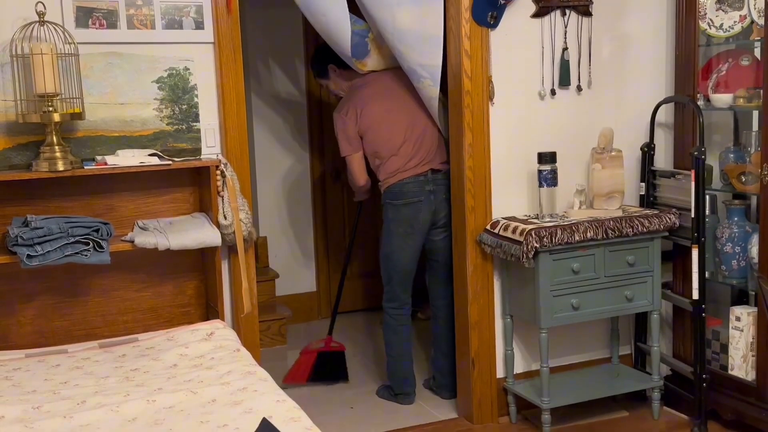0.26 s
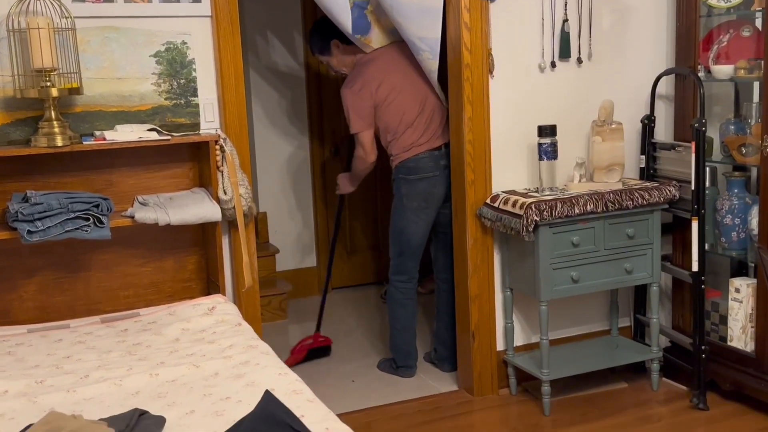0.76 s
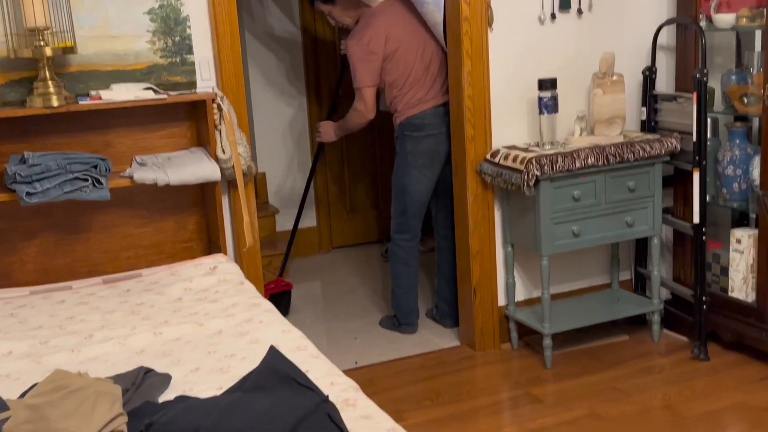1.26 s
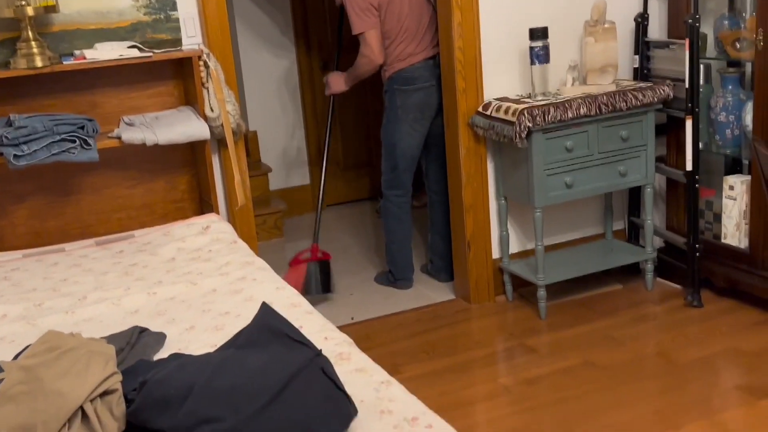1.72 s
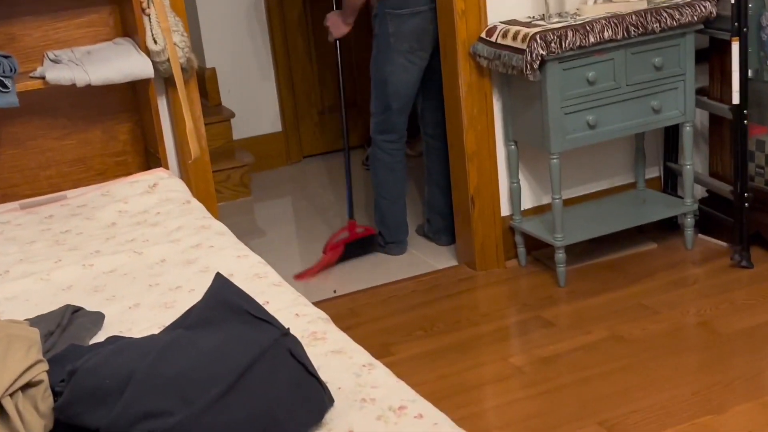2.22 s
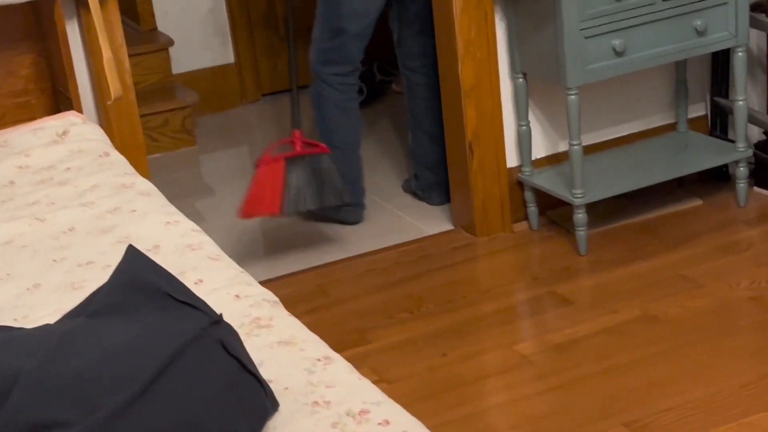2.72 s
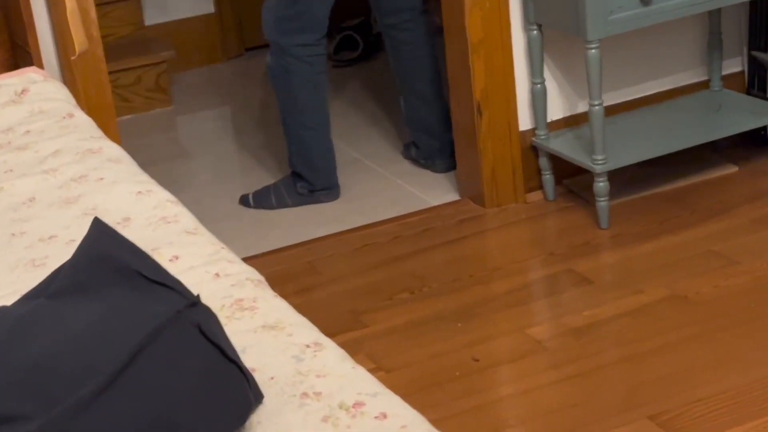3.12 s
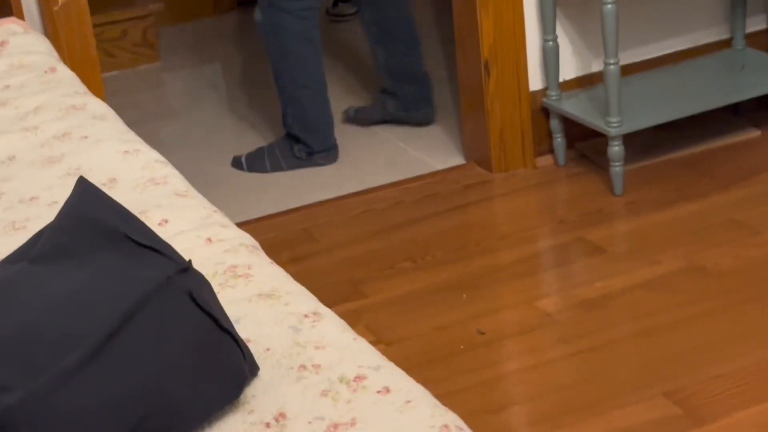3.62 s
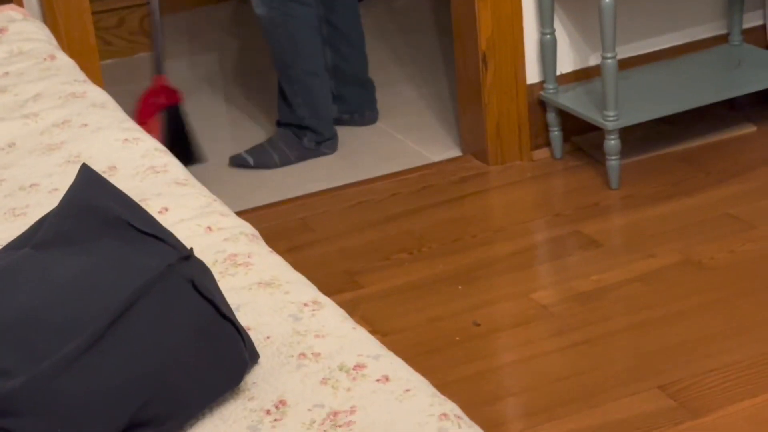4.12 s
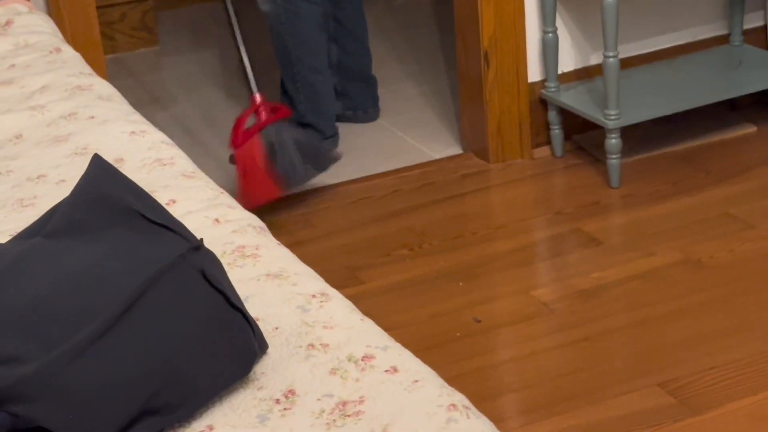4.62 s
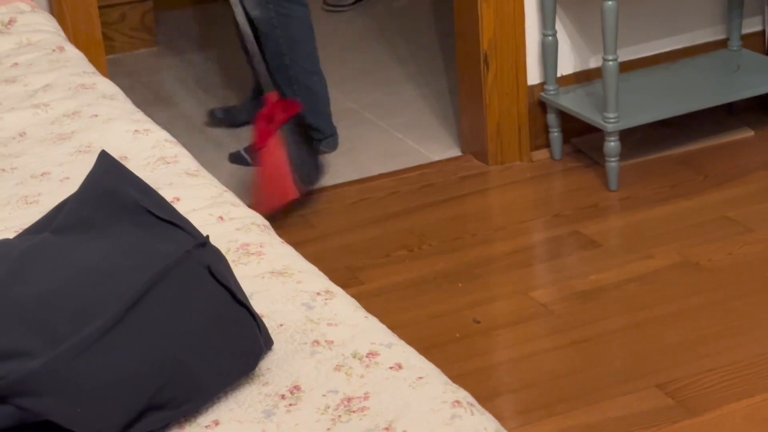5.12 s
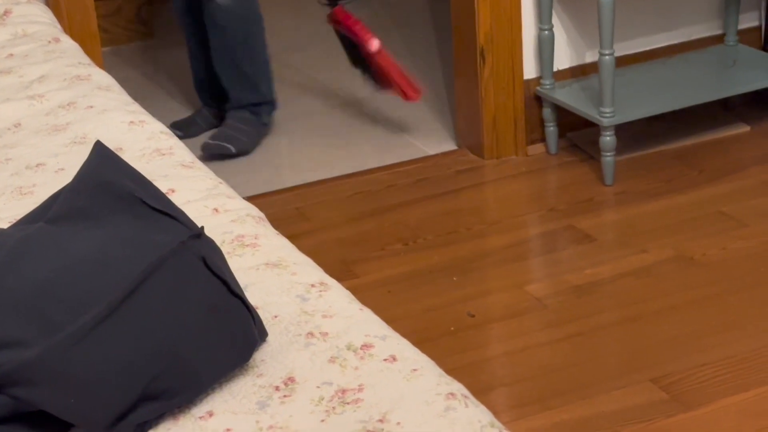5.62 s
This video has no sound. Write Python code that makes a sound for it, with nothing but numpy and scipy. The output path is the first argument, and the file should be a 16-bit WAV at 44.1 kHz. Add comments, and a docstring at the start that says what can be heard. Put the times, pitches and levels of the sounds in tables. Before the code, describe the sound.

Stiff bristles land, drag and trail off on a hard hallway floor, making airy hiss and lower scrape. Early touches are soft; a sudden crisp stroke stands out, followed by near quiet. Later sweeps are firmer, with plastic rattle, wooden thuds and a dull floor boom on the last knock. Distant phone pickup, reflective tiled space, faint steady hiss and low house rumble beneath.

```python
"""A plastic broom sweeps a tiled hallway in the next room, over the low rumble of the house.
House: filtered noise whose rumble slowly swells and sinks. Feet: short dull tones from the floor.
Broom: dense random clicks, filtered into hiss and scrape, with a few raspy whistles for squeaks.
Knocks: fading tones of the plastic head, woodwork and floor; the last one has a low thump.
The hallway adds echoes after each stroke."""
import sys
import numpy as np
from scipy import signal
from scipy.fft import rfft, irfft, next_fast_len
from scipy.io import wavfile
from scipy.ndimage import uniform_filter1d

SR = 44100
rng = np.random.default_rng(int(sys.argv[2]) if len(sys.argv) > 2 else 0)


def wrap_up_sound(samples):
    """Save the sound to the file named by the first command line argument, as 16-bit audio."""
    columns = np.atleast_2d(samples).T
    # keep every value between -1 and 1, then stretch to whole-number steps
    tamed = np.clip(columns, -1, 1)
    steps = np.round(tamed * 32767).astype(np.int16)
    wavfile.write(sys.argv[1], SR, steps)


N = 258602
TIME = np.arange(N) / SR
TOP_HZ = 15700  # upper limit of the sound


def undb(db):
    """Turn decibels into a plain gain."""
    return 10 ** (np.asarray(db) / 20)


def unit(x):
    """Scale to an rms (average strength) of 1."""
    return x / np.sqrt(np.mean(x ** 2))


def along(points, hz):
    """Read a value between (f/Hz, value) points, spacing pitch by ratio as the ear does."""
    f, value = np.transpose(points)
    return np.interp(np.log(np.maximum(hz, 1)), np.log(f), value)


def shape(x, response):
    """Filter a signal by a response given as a function of frequency."""
    size = next_fast_len(N + SR)
    hz = np.arange(size // 2 + 1) * SR / size
    return irfft(rfft(x, size) * response(hz), size)[:N]


def colour(x, points):
    """Give a signal a (f/Hz, level/dB) spectrum, keeping the power of white noise."""
    return shape(x, lambda hz: unit(undb(along(points, hz))))


def walk(rate):
    """Smooth random wander with an rms of 1; a higher rate (steps per second) wanders faster."""
    size = int(SR / rate)
    steps = np.repeat(rng.standard_normal(N // size + 1), size)[:N]
    smoothed = uniform_filter1d(uniform_filter1d(steps, size), size)
    return unit(smoothed)


def fade(t, t60):
    """Start at t = 0 and die away exponentially, falling 60 dB in t60 seconds."""
    return (t >= 0) * np.exp(-np.log(1000) * np.maximum(t, 0) / t60)


def ring(modes, t):
    """An object struck at t = 0 rings in several fading tones of alternating sign, for one second at most."""
    out = np.zeros(len(t))
    live = (t >= 0) & (t < 1)
    for k, (hz, db, t60) in enumerate(modes):
        tone = np.sin(2 * np.pi * hz * t[live]) * fade(t[live], t60)
        out[live] += (-1) ** k * undb(db) * tone
    return out


def flicks(per_s, spread_db):
    """Many small slips make dense random clicks; a larger spread lets a few stand out."""
    size = undb(spread_db * np.minimum(rng.exponential(size=N), 4))
    hits = rng.random(N) < per_s / SR
    return unit(hits * size * rng.standard_normal(N))


# spectrum of the rumble and faint hiss of the house: f/Hz, level/dB (per Hz, relative)
HOUSE_SPECTRUM = [(20, -16), (35, -8), (55, .5), (80, -3.5), (115, -2), (160, -9), (220, -11.5), (320, -18),
                  (480, -25), (700, -35), (1200, -42), (1800, -35.5), (4500, -42), (7000, -37),
                  (12000, -49), (15500, -45)]
HOUSE_DB = -50  # level of the noise before its low part is changed
RUMBLE_DB, RUMBLE_WANDER_DB = -50, -1.56  # level of the low part, and its wander (rms; sign flips it)


def house():
    """Noise gives a low rumble that slowly swells and sinks, under a steady faint hiss."""
    noise = undb(HOUSE_DB) * colour(rng.standard_normal(N), HOUSE_SPECTRUM)
    low = shape(noise, lambda hz: 1 / (1 + (hz / 160) ** 4))
    wander_db = RUMBLE_WANDER_DB * walk(rate=1.18)
    return noise - low + low * undb(RUMBLE_DB - HOUSE_DB + wander_db)


# hallway decay: f/Hz, time to fall 60 dB t60/s
HALL_DECAY = [(200, 0.48), (1400, 0.51), (4000, 0.4), (12000, 0.44)]


def hallway(x, linger_db=-10, linger_t60=1.37):
    """Echoes alone: dense ones from tiles and walls, then a faint bright tail that lingers."""
    edges = np.geomspace(80, 20480, 9)
    t = TIME[:2 * SR]
    noise, late = rng.standard_normal((2, len(t)))
    echo = np.zeros(len(t))
    for lo, hi in zip(edges, edges[1:]):
        band_filter = signal.butter(2, [lo, hi], "band", fs=SR, output="sos")
        band = signal.sosfilt(band_filter, noise)
        echo += band * fade(t - .004, along(HALL_DECAY, np.sqrt(lo * hi)))
    bright_filter = signal.butter(1, 2600, "high", fs=SR, output="sos")
    tail = signal.sosfilt(bright_filter, late) * fade(t - .03, linger_t60)
    response = echo / np.linalg.norm(echo) + undb(linger_db) * tail / np.linalg.norm(tail)
    return signal.fftconvolve(x, response)[:N]


# stockinged feet on the floor: t/s, level/dB (before mixing)
FOOTFALL_TIMES = [(.59, -37), (3.542, -35), (5.151, -41)]


def footfalls(pitch_hz=100, t60=0.093):
    """A padded heel gives the floor one short, dull push, heard as a fading low tone."""
    return sum(ring([(pitch_hz, db, t60)], TIME - start) for start, db in FOOTFALL_TIMES)


# tones of the hollow plastic head: f/Hz, level/dB (relative), time to fall 60 dB t60/s
HEAD_TONES = [(393, -6, 0.089), (458, -5.5, 0.18), (681, -10.5, 0.66), (732, -3.5, 0.13), (794, -1, 0.13),
              (895, -1, 0.1), (1002, 4.5, 0.039), (1115, 3.5, 0.046), (1163, -5.5, 0.11),
              (1253, -1.5, 0.099), (1330, -4, 0.15), (1650, -11, .07), (1980, -13, .07), (2220, -10, 0.054)]
# tones of the woodwork: f/Hz, level/dB (relative), time to fall 60 dB t60/s
WOOD_TONES = [(71.3, -18.5, 1), (111, -5.5, 0.44), (148, -23, 0.26), (165.9, -5.5, 0.47), (216.4, -1, 0.14),
              (250.3, -3.5, 0.11), (280.3, -5.5, 0.2), (346, -9, 0.073)]
# knocks of the broom head: t/s, clack level/dB, contact brightness f/Hz, wood thud level/dB,
# floor boom level/dB, boom lag t/s (levels before mixing)
KNOCK_TIMES = [(1.251, -50, 2570, -44.5, -58, 0.032), (2.05, -40.5, 2830, -43, -45, 0.043),
               (4.309, -28.5, 1800, -39.5, -31, 0.0384), (4.906, -33, 3500, -25.5, -24.5, 0.0303)]
FLOOR_HZ, FLOOR_T60_S = 70.5, 0.25


def knocks(rattle_db=1, rattle_t60=0.079, rebound_s=0.0241, rebound_db=-5):
    """The head clacks and rattles on its handle; the woodwork thuds and the floor booms a moment later."""
    clacks, lows = np.zeros(N), np.zeros(N)
    head = ring(HEAD_TONES, TIME[:SR]) / np.linalg.norm(undb([db for _, db, _ in HEAD_TONES]))
    for start, clack_db, bright_hz, thud_db, boom_db, lag in KNOCK_TIMES:
        t = TIME - start
        rattle = flicks(per_s=640, spread_db=5.0) * fade(t, rattle_t60)
        blow = undb(rattle_db) * rattle / np.linalg.norm(rattle)
        blow[int(start * SR)] += .5
        # a softer contact leaves the upper tones quiet
        softener = signal.butter(2, min(bright_hz, TOP_HZ), fs=SR, output="sos")
        blow = signal.sosfilt(softener, blow)
        clacks += undb(clack_db) * signal.fftconvolve(blow, head)[:N]
        # the head springs back and pushes the wood a second time
        for push, db in ((t, thud_db), (t - rebound_s, thud_db + rebound_db)):
            lows += undb(db) * ring(WOOD_TONES, push) * np.clip(push / 0.0034, 0, 1)
        boom = ring([(FLOOR_HZ, boom_db, FLOOR_T60_S)], t - lag)
        lows += boom * np.clip((t - lag) / 0.0104, 0, 1)
    return clacks, lows


# bristles squeaking on the tiles: centre t/s, pitch f/Hz, level/dB (before mixing),
# length t/s (to fall to about a third on either side)
SQUEAK_TIMES = [(3.833, 7900, -43, 0.0065), (3.842, 5100, -49.5, 0.027), (3.899, 4300, -47.5, 0.0038),
                (3.943, 5030, -55, 0.022), (3.944, 6400, -51, .006)]


def squeaks():
    """A few stiff bristles stick and slip together: brief whistles, raspy from a jittering pitch."""
    out = np.zeros(N)
    for centre, hz, db, length in SQUEAK_TIMES:
        pitch = hz * (1 + .06 * walk(rate=2500))
        whistle = np.sin(2 * np.pi * np.cumsum(pitch) / SR)
        out += undb(db) * np.exp(-np.abs(TIME - centre) / length) * whistle
    return out


def contact(start, rise, hold, t60):
    """Pressure of bristles on the floor: it builds, holds and lets go."""
    t = TIME - start
    return np.clip(t / rise, 0, 1) * fade(np.maximum(t - rise - hold, 0), t60)


# the broom is set down and its bristles splay: t/s, hiss level/dB, scrape level/dB (relative to the hiss)
LANDING_TIMES = [(.549, -48, -2), (1.243, -47.5, 1.5), (2.046, -46, 3), (2.308, -35.5, -9), (3.273, -53, 1),
                 (4.306, -47.5, 6), (4.902, -47.5, 8)]
LAND_SHORTEST_RISE_S, LAND_HOLD_S, LAND_T60_S = .005, .02, 0.37
# below the reference hiss level, each further drop of this size doubles the rise time
LAND_REF_DB, LAND_SLOWER_DB = -45, 4
# it is pulled over the tiles, then trails off lightly: peak t/s, swell t/s, hiss level/dB, trailing level/dB
DRAG_TIMES = [(.14, 0.17, -62.5, -65.5), (.785, 0.1, -54, -54.5), (1.385, 0.05, -56.5, -55.5),
              (1.63, 0.15, -60, -59), (2.125, 0.026, -52.5, -55), (2.341, .012, -35.5, -57),
              (2.425, 0.025, -48.5, -71), (3.52, 0.31, -64, -66), (3.81, 0.097, -52.5, -56.5),
              (4.18, 0.095, -52.5, -57.5), (4.485, .078, -40.5, -49), (5.017, 0.021, -41.5, -50.5)]
DRAG_HOLD_S, DRAG_T60_S, DRAG_SCRAPE_DB = 0.015, 0.29, -6.5
TRAIL_T60_S, TRAIL_SCRAPE_DB = 2.53, -9
# a single tuft catches and springs free: t/s, rise t/s, hiss level/dB
SNAG_TIMES = [(.45, 0.016, -64.5), (2.217, 0.013, -57.5), (3.577, 0.022, -55), (3.825, .004, -46),
              (3.93, .008, -57), (4.098, 0.013, -55.5)]
SNAG_HOLD_S, SNAG_T60_S, SNAG_SCRAPE_DB = 0.007, 0.19, -6


def touches():
    """Every touch of the bristles, as (pressure, hiss dB, scrape dB relative to the hiss)."""
    for start, db, scrape_db in LANDING_TIMES:
        # a gentler landing builds up more slowly
        rise = LAND_SHORTEST_RISE_S * 2 ** (max(LAND_REF_DB - db, 0) / LAND_SLOWER_DB)
        yield contact(start, rise, LAND_HOLD_S, LAND_T60_S), db, scrape_db
    for peak, swell, db, trail_db in DRAG_TIMES:
        start = peak - swell
        yield contact(start, swell, DRAG_HOLD_S, DRAG_T60_S), db, DRAG_SCRAPE_DB
        yield contact(start, swell, DRAG_HOLD_S, TRAIL_T60_S), trail_db, TRAIL_SCRAPE_DB
    for start, rise, db in SNAG_TIMES:
        yield contact(start, rise, SNAG_HOLD_S, SNAG_T60_S), db, SNAG_SCRAPE_DB


# spectrum of the light bristle tips: f/Hz, level/dB (per Hz, relative)
HISS_SPECTRUM = [(1000, -26), (2500, -3), (3800, -3), (4500, -6), (5300, -0.5), (7000, 0.5), (8600, 0),
                 (10200, -0.5), (11500, -8), (13200, -5), (14500, -8), (15600, -2)]
# spectrum of the bent bristles: f/Hz, level/dB (per Hz, relative)
SCRAPE_SPECTRUM = [(100, 1), (250, 0.5), (420, 1.5), (580, 4), (800, 1), (1300, 5.5), (2000, 4), (3200, -4),
                   (4800, -11), (9000, -8)]


def bristles():
    """The broom lands, drags and trails off: light tips slip with a hiss, bent bristles with a lower scrape."""
    hiss_power, scrape_power = np.zeros(N), np.zeros(N)
    for pressure, db, scrape_db in touches():
        hiss_power += (pressure * undb(db)) ** 2
        scrape_power += (pressure * undb(db + scrape_db)) ** 2
    # tufts catch and release together, so the rubbing is uneven
    tufts = undb(0.83 * walk(rate=120))
    tips = flicks(per_s=7000, spread_db=0.0)
    stems = flicks(per_s=4000, spread_db=2.5)
    hiss = colour(tips * tufts * np.sqrt(hiss_power), HISS_SPECTRUM)
    scrape = colour(stems * tufts * np.sqrt(scrape_power), SCRAPE_SPECTRUM)
    return hiss + scrape


# lead of the left microphone port over the right: f/Hz, phase/rad
PHASE_LEAD = [(6850, 0), (7420, 3.1), (8000, 6.3), (8950, 6.3), (9700, 5.2), (10450, 3.25), (11750, 3.05),
              (12400, 2.1), (13200, 0)]
# how alike the two ports sound: f/Hz, likeness (0 to 1)
LIKENESS = [(30, .995), (100, .96), (280, .87), (600, .55), (950, .55), (1300, .3), (1680, 0), (2000, .82),
            (2400, .97), (3400, .998)]
# left level minus right level: f/Hz, level/dB
BALANCE = [(250, 0), (600, -1), (1100, -1.5), (1450, -4.5), (2100, 0)]


def ports(sound, diffuse):
    """Two close microphone ports: diffuse sound makes them differ; the phone's body shifts level and phase."""
    mid = shape(sound, lambda hz: np.sqrt((1 + np.clip(along(LIKENESS, hz), 0, 1)) / 2))
    side = shape(diffuse, lambda hz: np.sqrt((1 - np.clip(along(LIKENESS, hz), 0, 1)) / 2))

    def port(sign):
        """One port: +1 is left, -1 is right, each given half of the level and phase difference."""
        def body(hz):
            gain = undb(sign * along(BALANCE, hz) / 2)
            return gain * np.exp(sign * 1j * along(PHASE_LEAD, hz) / 2)
        return shape(mid + sign * side, body)

    return np.array([port(1), port(-1)])


def scene(broom_wet_db=-3, clack_wet_db=2, low_wet_db=-7):
    """Broom, knocks and feet, with hallway echoes of broom and knocks, over the rumble of the house."""
    clacks, lows = knocks()
    broom = bristles() + squeaks()
    direct = broom + clacks + lows + footfalls()
    echo_feed = undb(broom_wet_db) * broom + undb(clack_wet_db) * clacks + undb(low_wet_db) * lows
    sound = undb(0.5) * (direct + hallway(echo_feed)) + house()
    # reflections that arrive from the sides reach the two ports differently
    diffuse = hallway(undb(4) * (broom + clacks) + lows) + house()
    return ports(sound, diffuse)


def record(dry):
    """The phone cuts the top: a steep low-pass filter removes the highest treble."""
    low_pass = signal.ellip(10, .2, 80, TOP_HZ, fs=SR, output="sos")
    return signal.sosfilt(low_pass, dry)


dry = scene()
out = record(dry)
wrap_up_sound(out)
```